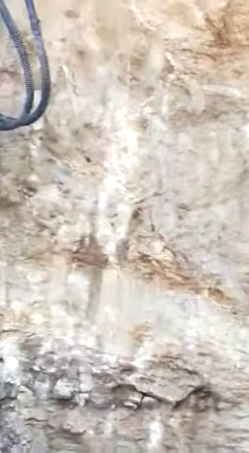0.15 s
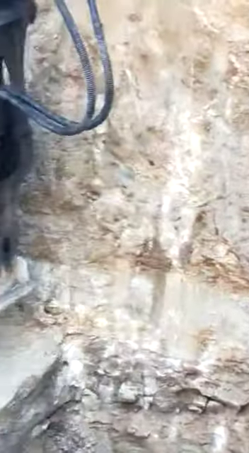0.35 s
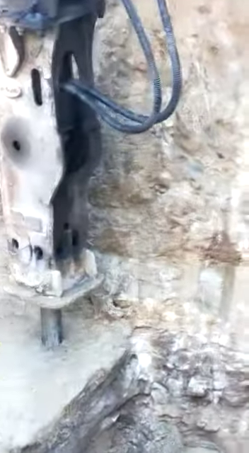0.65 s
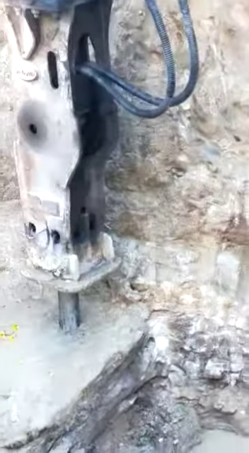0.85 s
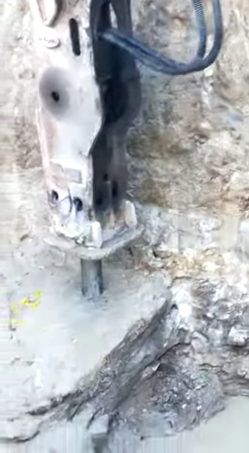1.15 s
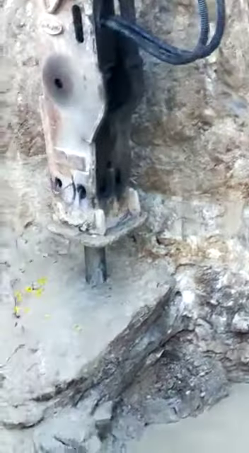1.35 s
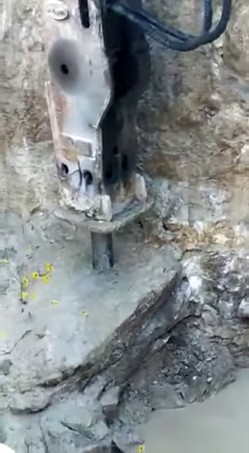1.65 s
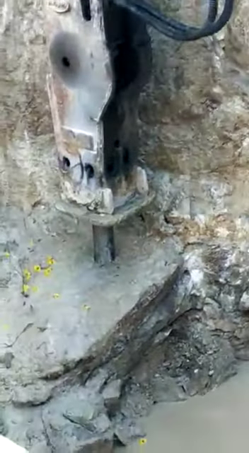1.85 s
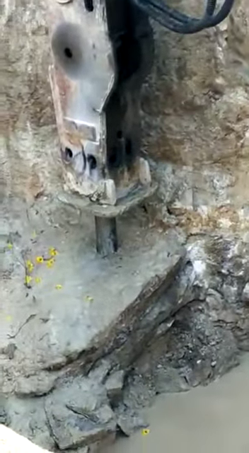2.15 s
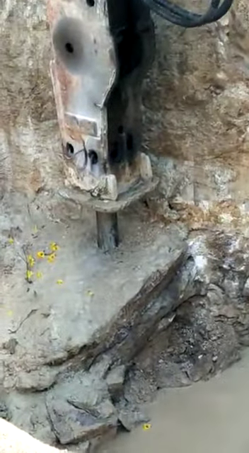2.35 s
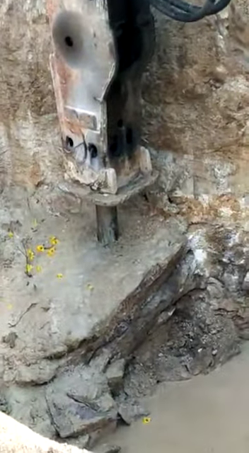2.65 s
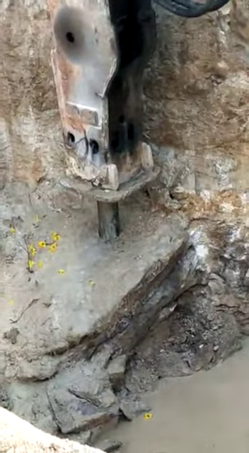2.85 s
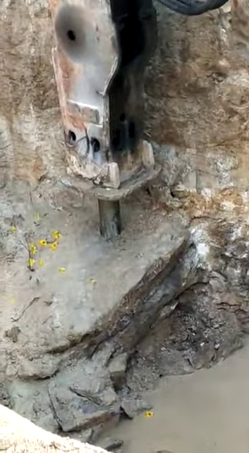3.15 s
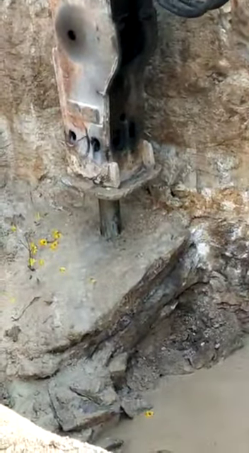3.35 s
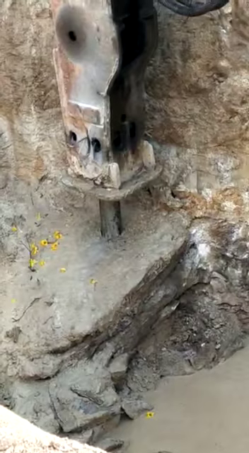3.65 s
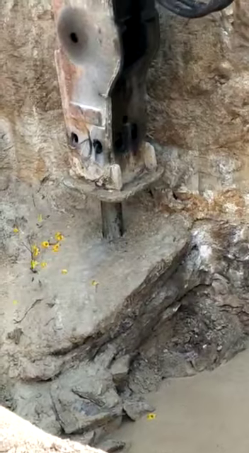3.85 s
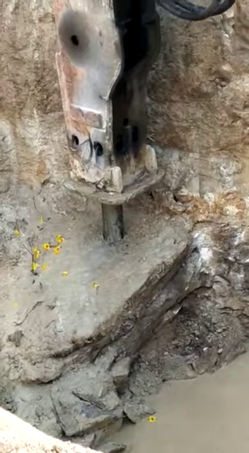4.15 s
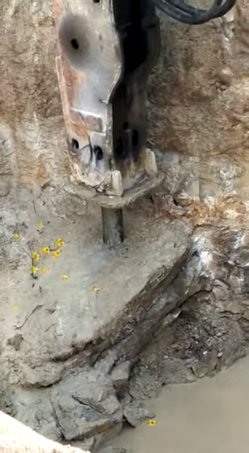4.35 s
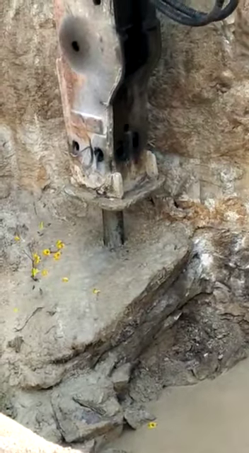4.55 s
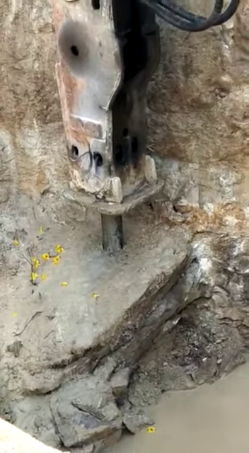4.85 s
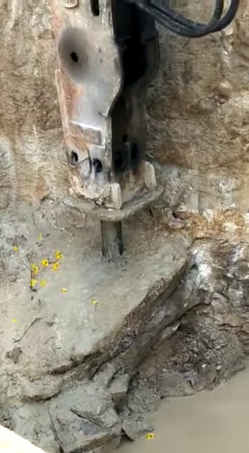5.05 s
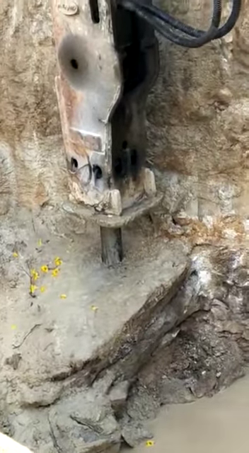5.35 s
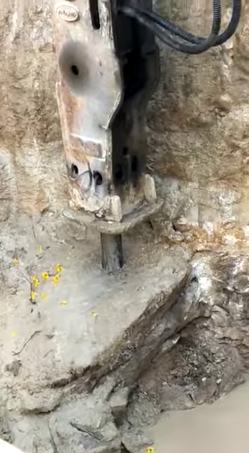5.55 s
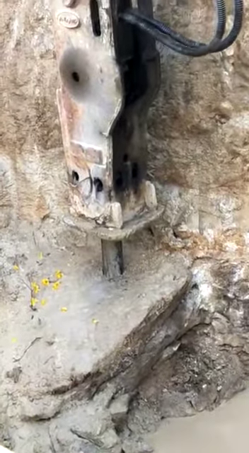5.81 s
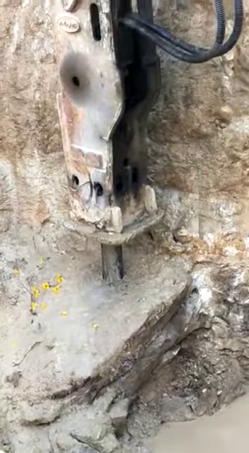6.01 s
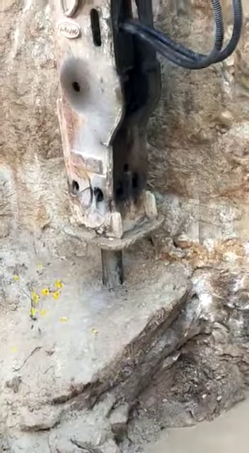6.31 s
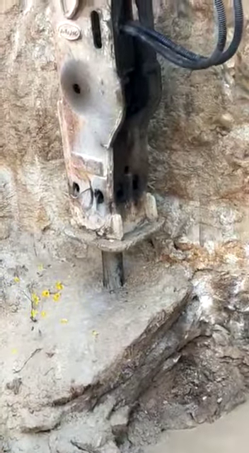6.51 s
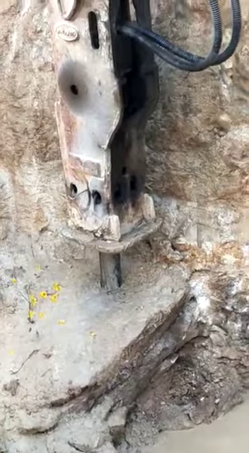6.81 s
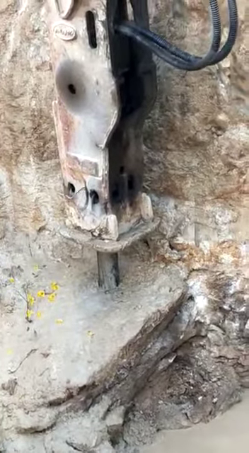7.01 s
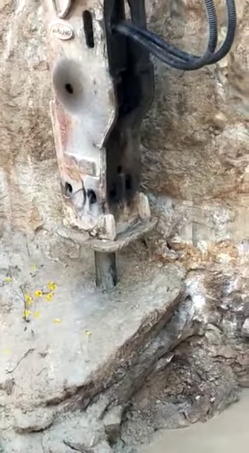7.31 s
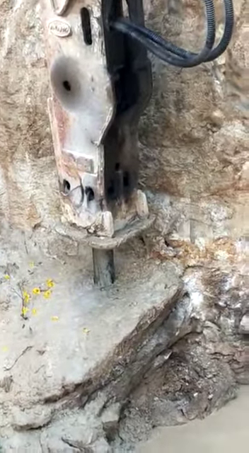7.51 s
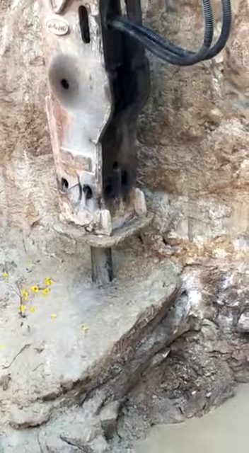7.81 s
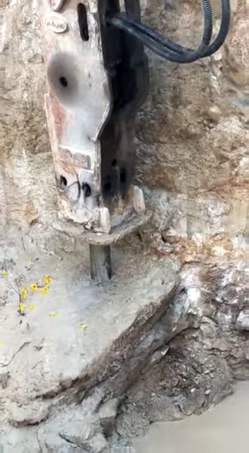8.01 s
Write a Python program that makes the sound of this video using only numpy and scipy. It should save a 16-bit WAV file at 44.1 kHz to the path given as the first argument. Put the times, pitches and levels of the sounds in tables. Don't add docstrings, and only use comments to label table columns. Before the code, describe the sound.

Close up in a rock-walled pit, an excavator's hydraulic breaker hammers a slab at about thirteen near-identical blows a second. Each stroke has a tiny valve hiss, a gritty crunch and a ringing steel housing. Three brief pauses expose clanks, a low engine idle and squealing oil. The phone's left side starts muffled by a hand, then opens to bass; the right stays loud and clear.

```python
import sys
import numpy as np
from scipy import signal
from scipy.fft import rfft, irfft, next_fast_len
from scipy.io import wavfile
from scipy.ndimage import uniform_filter1d, map_coordinates

SR = 44100
rng = np.random.default_rng(int(sys.argv[2]) if len(sys.argv) > 2 else 0)


def output_pcm(signal):
    pcm = np.clip(np.atleast_2d(signal).T, -1, 1) * 32767
    wavfile.write(sys.argv[1], SR, np.round(pcm).astype(np.int16))


def boost(x):
    u = np.asarray(x, float) / 20
    return 10 ** u


N = 360297
STROKE_S = 0.079


def unit(x):
    return x / np.sqrt(np.mean(x ** 2) + 1e-20)


def along(points, hz):
    f, v = np.transpose(points)
    return np.interp(np.log(hz + 1), np.log(f + 1), v)


def curve(rows):
    return np.interp(np.arange(N) / SR, *np.transpose(rows))


def filtered(x, response):
    n = x.shape[-1]
    m = next_fast_len(n + 4096)
    return irfft(rfft(x, m) * response(np.fft.rfftfreq(m, 1 / SR)), m)[..., :n]


def peaks(modes):
    def response(f):
        total = 0
        for k, (centre, width, db) in enumerate(modes):
            damping = 1j * f * width
            total = total + (-1) ** k * boost(db) * damping / (centre * centre - f * f + damping)
        return total
    return response


def lay(sounds, times):
    out = np.zeros(N + 2 * SR)
    for row, s in zip(sounds, times):
        out[SR + round(s * SR):][:len(row)] += row
    return out[SR:SR + N]


def pit(x):
    # hz, level_db, t60_s
    answer = [(100, -9, 0.87), (500, -12.5, 0.94), (1200, -8.5, 0.55), (2500, -17, 0.48), (5030, -12, 0.64),
              (9000, -1, 0.26), (16000, -19, 0.51)]
    hz, t, z = signal.stft(rng.standard_normal(SR // 2), SR, nperseg=256)
    f, db, t60 = np.transpose(answer)
    gain = boost(along(np.c_[f, db], hz)[:, None] - 60 * t / along(np.c_[f, t60], hz)[:, None])
    swell = (1 - np.exp(-t / 0.018)) / (1 + (t / 0.16) ** 6)
    tail = signal.istft(z * gain * swell, SR, nperseg=256)[1]
    return signal.fftconvolve(x, tail / 40)[:N]


def seeping():
    # start_s, end_s, first_db, last_db
    leaks = [
        (.9, 1.06, -72, -57),
        (3.43, 3.70, -66, -65.5),
        (5.46, 5.73, -69.5, -61.5),
    ]
    fade_s, shut_db = 0.024, -25
    rows = []
    for start, end, first_db, last_db in leaks:
        rows += [(start - fade_s, first_db + shut_db), (start, first_db)]
        rows += [(end, last_db), (end + fade_s, last_db + shut_db)]
    return curve(rows)


def engine():
    # pitch_hz, rms_db
    idle = [(88, -62), (146, -63), (175, -62.5), (206, -68), (250, -64)]
    # time_s, level_db
    revs = [
        (.9, -54.5),
        (3.6, -51),
        (5.6, -53.5),
    ]
    # hz, level_db
    exhaust_colour = [(15, -57), (25, -37.5), (92, 14), (115, -14.5), (327, -8.5), (480, -5), (635, -7.5),
                      (1000, -15), (1430, -10), (5260, -37), (11000, -57), (14300, -88.5), (22000, -120)]
    # pitch_hz, width_hz, level_db
    seep = [(1520, 130, 0), (1700, 60, -2), (2010, 60, -8), (2160, 65, -3)]
    t = np.arange(N) / SR
    orders = sum(boost(db) * np.sqrt(2) * np.sin(2 * np.pi * (hz * t + rng.random())) for hz, db in idle)
    exhaust = unit(filtered(rng.standard_normal(N), lambda hz: boost(along(exhaust_colour, hz))))
    fan = unit(filtered(rng.standard_normal(N), peaks([(3200, 700, 0), (5100, 1100, 0.014)])))
    oil = 0
    for mode in seep:
        lumps = map_coordinates(rng.standard_normal(300), [t * 28])
        squeal = filtered(rng.standard_normal(N), lambda f: peaks([mode])(f) ** 2)
        oil = oil + boost(4.1 * lumps) * squeal
    revs_db = curve(revs)
    return orders + boost(revs_db) * exhaust + boost(revs_db - 18.5) * fan + boost(15.0 + seeping()) * unit(oil)


def clanks():
    # start_s, level_db, pitch_hz, t60_s
    parts = [(.575, -24, 1445, 0.3), (.575, -30, 1490, .3), (0.572, -20, 2400, 0.086),
             (3.52, -40, 170, .08), (3.452, -38, 165, .08), (3.54, -39, 980, .1), (3.544, -40, 890, .2),
             (3.548, -42, 800, 0.23), (3.553, -41, 690, 0.31), (3.548, -54, 3200, .08),
             (3.659, -55, 4500, 0.19), (1.061, -21, 2400, .09), (.578, -52, 14200, .35),
             (.576, -54, 15200, .15), (1.001, -56, 3350, 0.34), (1.03, -52, 4850, .1),
             (3.593, -28, 200, 0.08), (3.68, -41, 650, 0.24), (1.0411, -41, 650, .2), (5.71, -42, 650, .2),
             (5.68, -56, 1030, .3)]
    t = np.arange(SR // 3) / SR
    rings = []
    for _, db, hz, t60 in parts:
        ring = boost(db - 60 * t / t60) * (1 - np.exp(-t / 0.0032)) * np.sin(2 * np.pi * hz * t)
        knots = rng.standard_normal(34)
        rough = boost(5.2 * map_coordinates(knots, [t * 90]))
        rings.append(ring * rough)
    return lay(rings, [row[0] for row in parts])


def blows():
    # first_s, last_s, strength_db, thud_db,
    # limp_ms (every other blow late, the rest early)
    runs = [(.0098, .4847, -10.5, 1, -0.0089), (0.5703, .5704, -11.5, -2, -0.065),
            (1.0589, 1.0595, -11, -2, 0), (1.154, 1.1541, -9.5, 2, 0.074), (1.2287, 1.6228, -10, 1.5, 0),
            (1.702, 2.3367, -10.5, 0.5, -0.026), (2.4155, 3.2857, -10, 2, -0.03),
            (3.703, 3.703, -11, -1.5, -0.068), (3.791, 4.4209, -10.5, 2, 0.069),
            (4.4999, 4.8955, -10, 1.6, -0.011), (4.974, 5.2885, -10.5, 2.6, 0),
            (5.73, 5.7306, -11, -1.5, -0.071), (5.8254, 5.8252, -10, 2.5, 0),
            (5.8986, 7.0125, -10.5, 2.5, 0.55), (7.0914, 7.6446, -10.5, 2, -0.38),
            (7.7227, 8.116, -11, 2.5, -0.46)]
    steel_db, cold_steel_db = 1.6, -0.8
    valve_db, cold_valve_db = -43, -3
    weak_valve_db, late_s = -7, 0.083
    rows = []
    for first, last, db, thud_db, limp_ms in runs:
        s = np.linspace(first, last, round((last - first) / STROKE_S) + 1)
        limp = limp_ms / 1000 * (-1) ** np.arange(len(s))
        rows.append(np.c_[s + limp, np.full((len(s), 2), (db, thud_db))])
    rows = np.vstack(rows)
    before = np.diff(rows[:, 0], prepend=0)
    after = np.diff(rows[:, 0], append=rows[-1, 0])
    restart = before > 2 * STROKE_S
    dragging = (before > late_s) & (after > 2 * STROKE_S)
    jet_db = valve_db + weak_valve_db * dragging + cold_valve_db * restart
    return np.c_[rows, steel_db + cold_steel_db * restart, jet_db]


def valve():
    # hz, level_db
    jet_colour = [(240, -40), (400, -3), (598, 12.5), (1870, -9.5), (2150, 12.5), (2510, -10), (3120, 4.5),
                  (15000, -20.5), (16000, -46)]
    # pitch_hz, width_hz, level_db
    whistle_modes = [(4920, 64, 5.5), (7750, 165, -10.5), (11750, 170, -19.5), (14830, 200, -11.5)]
    s, db = blows().T[[0, 4]]
    t = np.arange(1100) / SR
    gate = (1 - np.exp(-t / 0.004)) * np.exp(-t / 0.03) / (1 + (t / 0.017) ** 8)
    jet = unit(filtered(rng.standard_normal((len(s), len(t))), lambda hz: boost(along(jet_colour, hz))))
    breath = rng.standard_normal(len(t)) + 0.5 * rng.standard_normal((len(s), len(t)))
    whistle = unit(filtered(breath, peaks(whistle_modes)))
    return lay(boost(db[:, None]) * gate * (boost(17) * jet + boost(11) * whistle), s - 0.0195)


def ringing(modes, t, scatter_db, slip, count):
    hz, db, t60, peak = np.transpose(modes)[:, :, None]
    swell = np.exp(-(np.minimum(t - peak, 0) / 0.0041) ** 2) * (1 - np.exp(-t / 0.00063))
    decay = boost(db - 60 * np.maximum(t - peak, 0) / np.clip(t60, 0.02, 0.6))
    partials = swell * decay * np.exp(2j * np.pi * hz * t)
    chance = rng.standard_normal((2, count, len(modes)))
    wander = np.cumsum(chance, axis=1)
    drift = 0.25
    size, turn = chance + drift * (wander - wander.mean(axis=1, keepdims=True))
    sign = (-1) ** np.arange(len(modes))
    strikes = sign * boost(scatter_db * size) * np.exp(1j * slip * turn)
    return (strikes @ partials).imag


def repeated(spectrum, size, count):
    # hz, share
    same = [(300, .98), (1500, .96), (4000, .82), (8000, .25), (14000, .1)]
    share = lambda hz: np.clip(along(same, hz), 0, 1)
    colour = lambda hz: boost(along(spectrum, hz))
    shared = filtered(rng.standard_normal(size), lambda hz: colour(hz) * np.sqrt(share(hz)))
    fresh = filtered(rng.standard_normal((count, size)), lambda hz: colour(hz) * np.sqrt(1 - share(hz)))
    return unit(shared + fresh)


def breaker():
    # pitch_hz,
    # level_db, t60_s, loudest_s
    housing = [(51.35, -28.5, 0.17, 0.044), (82.9, -10, 0.11, 0.016), (159.1, 1.5, 0.14, 0.0064),
               (189.9, -9, 0.12, 0.034), (292.4, -10.5, 0.23, 0.0386), (324.8, -4.5, 0.11, 0.018),
               (323.8, -1, 0.025, 0.01435), (398.5, -3.5, 0.12, 0.00079), (441.8, -8.5, 0.18, 0.022),
               (490.4, -18.5, 0.25, 0.0492), (542.7, -7, 0.17, 0.004), (566.7, -11.5, 0.062, 0.036),
               (666.6, 3, 0.048, 0.0026), (700, -8.5, 0.11, 0.0386), (746.2, -8.5, 0.14, 0.033),
               (803, 3, 0.043, 0.0164), (917.6, -2.5, 0.15, 0.0208), (923, -8, 0.046, 0.016),
               (981, -5, 0.095, 0.0046), (983, -15.5, 0.065, 0.049), (1099, -2.5, 0.12, 0.0227),
               (1125, -6, 0.076, 0.00067), (1218, -9, 0.067, 0.054), (1278.6, -6, 0.14, 0.01),
               (1285, 5.5, 0.031, 0.0015), (1447, -17, 0.53, 0.0064), (1007, -13, 0.25, 0.0074),
               (1384.5, -14, 0.042, 0.019), (73.2, -22.5, 0.064, .03), (114.5, -20.5, 0.14, 0.021)]
    chisel = [(1541, -4.5, 0.041, .002), (1649, -11, 0.0083, 0.02), (1821, -6, 0.031, 0.0099),
              (1944, -19.5, 0.02, 0.0011), (2091, -5.5, 0.074, 0.013), (2306, -10, 0.042, 0.0057),
              (2624, -23, 0.071, 0.0087), (2843, -7, 0.017, 0.0094), (3060, -8, 0.018, 0.0078),
              (3227, -18.5, 0.24, 0.04), (3275, -9.5, 0.09, 0.02), (4249, -3.5, 0.021, 0.011),
              (4300, -31, 0.055, 0.028), (4570, -16, 0.024, 0.0084), (4654, -21, 0.079, 0.013),
              (5050, -7, 0.013, 0.0069), (5480, -3, 0.013, 0.0095), (5370, -18, 0.14, 0.029),
              (5900, -22.5, 0.017, 0.0056), (6830, -17.5, 0.07, 0.0016), (7820, -21.5, 0.037, 0.0085),
              (4680, -13, 0.087, 0.0066), (5170, -17.5, .04, 0.0088)]
    # hz, level_db (per Hz)
    crush_colour = [(35, -68.5), (60, -2), (715, 0), (1200, -25), (1470, -3.5), (1860, -4), (2520, -24),
                    (2900, -11), (3940, -19), (4320, -2.5), (5590, -10), (8510, -28), (16000, -31.5)]
    clatter_colour = [(120, -33.5), (200, 1.5), (373, 4), (465, -40.5), (722, -9.5), (1100, -3),
                      (1480, -0.5), (1590, 0.5), (2090, -0.5), (2560, -4.5), (5330, -15), (9930, -25),
                      (16000, -81)]
    # hz, t60_s
    clatter_t60 = [(100, 0.38), (400, 0.38), (1100, 0.31), (3000, 0.31), (8000, 0.13), (15000, 0.036)]
    # delay_s, level_db
    walls = [(.021, -10), (0.036, -13), (0.055, -14.5)]
    hits = blows()
    earlier = hits[0] - [STROKE_S, 0, 0, 0, 0]
    s, db, thud_db, steel_db, _ = np.vstack([earlier, hits]).T[:, :, None]
    size, count = 14336, len(s)
    t = np.arange(size) / SR

    held = (1 - np.exp(-t / 0.00028)) / (1 + (t / 0.02) ** 6)
    crush = boost(-2) * held * repeated(crush_colour, size, count)
    crush = filtered(crush, lambda f: 1 + sum(boost(d) * np.exp(-2j * np.pi * f * lag) for lag, d in walls))

    hz, frame, z = signal.stft(repeated(clatter_colour, size, count), SR, nperseg=256)
    dying = boost(-60 * frame / along(clatter_t60, hz)[:, None])
    clatter = signal.istft(z * dying, SR, nperseg=256)[1][:, :size]
    clatter = boost(-1.0) * (1 - np.exp(-t / 0.0016)) * clatter

    steel = ringing(housing, t, 0.5, 0.1, count) + ringing(chisel, t, 1.3, 0.45, count)

    thin = lambda f: 1 / (1 + (200 / (f + 1)) ** 4)
    heave_db = 2 * rng.standard_normal((count, 1))

    def tilt(f):
        heave = heave_db / (1 + (f / 110) ** 4)
        thud = thud_db / (1 + (f / 400) ** 4)
        bright = steel_db / (1 + (3000 / (f + 1)) ** 4)
        return boost(db + heave + thud + bright)

    fade = np.clip((t[-1] - t) / 0.033, 0, 1)
    strokes = filtered(filtered(crush + clatter, thin) + boost(1.5) * steel, tilt) * fade
    return lay(strokes, s[:, 0] + 0.00025 * rng.standard_normal(count))


def scene():
    hits = filtered(breaker(), lambda f: 1j * f / (45 + 1j * f))
    machine = boost(-7) * hits + valve() + clanks()
    site = machine + pit(machine) + engine()
    return np.array([site, site])


def sparse_treble(x, from_hz, bar):
    hz, _, z = signal.stft(x, SR, nperseg=2048)
    power = np.abs(z) ** 2
    masking = uniform_filter1d(uniform_filter1d(power, size=121, axis=-2), size=3, axis=-1)
    near = uniform_filter1d(power, size=7, axis=-2)
    weak = (power < bar * masking) | (near < bar * masking)
    return signal.istft(z * ~(weak & (hz[:, None] > from_hz)), SR, nperseg=2048)[1][:, :N]


def covered_port(x):
    # time_s, level_db
    uncover = [
        (0, -34),
        (.6, -34),
        (1.1, -14.5),
        (1.7, -14),
        (2.1, -4.5),
        (2.5, -4),
        (4, -3),
        (6, -3.5),
        (8.2, 0.5),
    ]
    # hz, level_db
    leak_bass = [(40, 3), (90, -0.5), (130, -5), (220, -8.5), (370, -11.5), (470, -24.5), (600, -82)]
    # hz, level_db
    leak_top = [(400, -56.5), (600, -22), (950, -20), (1300, -35.5), (2000, -23), (3800, -51), (4800, -146),
                (7000, -27), (9500, -21), (11200, -54.5), (12500, -72), (16000, -72)]
    lag = 1.25
    open_db = curve(uncover)
    late = lambda hz: lag + (hz / 430) ** 3
    bass = filtered(x, lambda hz: boost(along(leak_bass, hz)) * np.exp(-1j * late(hz)))
    t = np.arange(2048) / SR
    scatter = rng.standard_normal(len(t)) * np.exp(-t / 0.029)
    scattered = signal.fftconvolve(x, scatter / np.linalg.norm(scatter))[:N]
    direct = lambda hz: 1 / (1 + (hz / 1400) ** 4)
    top = filtered(x, lambda hz: boost(along(leak_top, hz)) * np.sqrt(direct(hz)) * np.exp(-1j * lag))
    top = top + filtered(scattered, lambda hz: boost(along(leak_top, hz)) * np.sqrt(1 - direct(hz)))
    rumble = boost(-69) * unit(filtered(rng.standard_normal(N), lambda hz: 1 / (1 + (hz / 25) ** 2)))
    return boost(open_db) * bass + boost(0.57 * open_db) * top + rumble


def low_pass(x):
    return signal.sosfilt(signal.butter(12, 17070, fs=SR, output="sos"), x)


def record(dry):
    # hz, width_hz, level_db
    port = [(3815, 268, -2.5), (9910, 310, -3.5), (12100, 600, 2), (13600, 300, 0), (15000, 1700, 4.5)]
    top_hz = 15850
    dry = filtered(dry, lambda hz: boost(sum(db * np.exp(-((hz - c) / w) ** 2) for c, w, db in port)))
    left = covered_port(dry[0])
    right = dry[1] / (1 + np.abs(dry[1] / 0.9) ** 6) ** (1 / 6)
    both = filtered(np.array([left, right]), lambda hz: np.clip((top_hz - hz) / 200 + 0.5, 0, 1) ** 2)
    both = sparse_treble(both, from_hz=7600, bar=0.3)
    return low_pass(both)


dry = scene()
out = record(dry)
output_pcm(out)
```